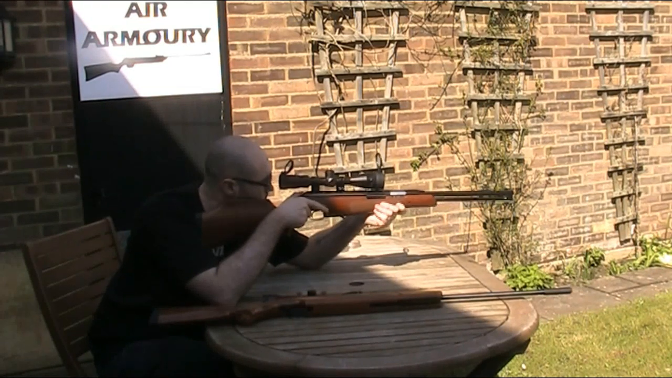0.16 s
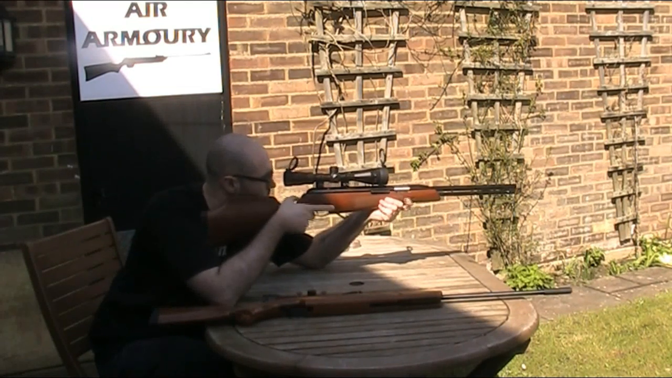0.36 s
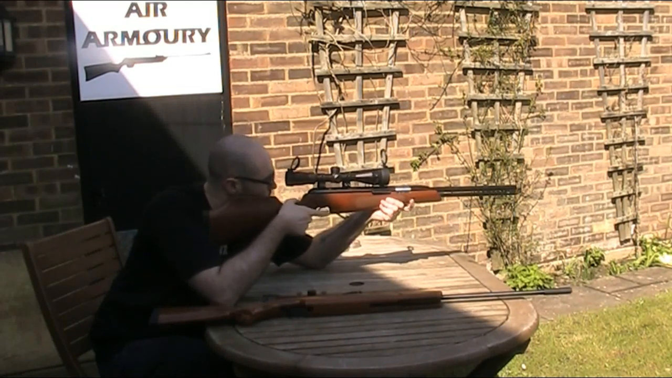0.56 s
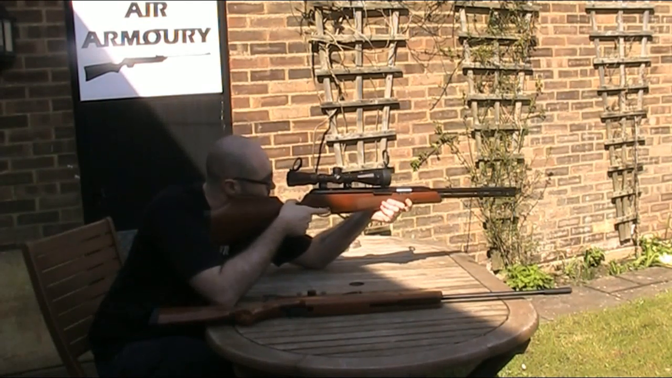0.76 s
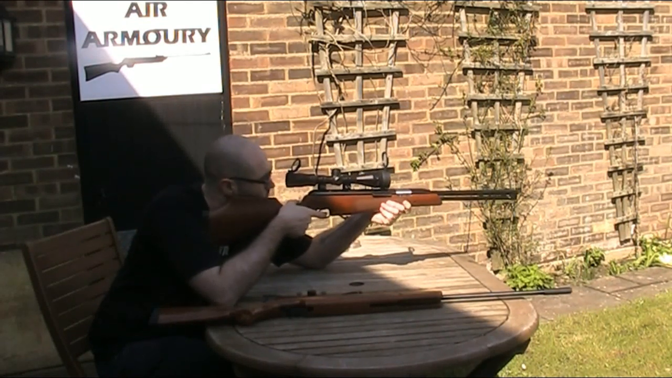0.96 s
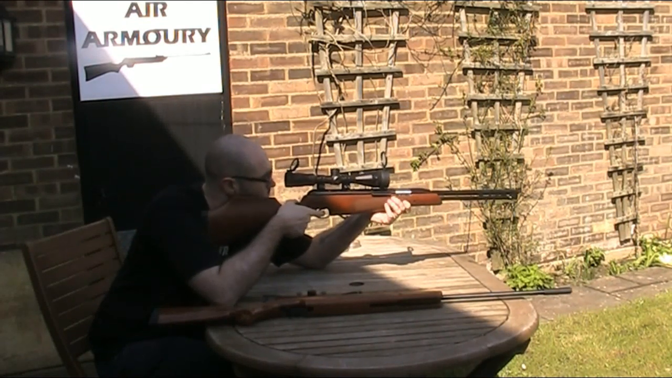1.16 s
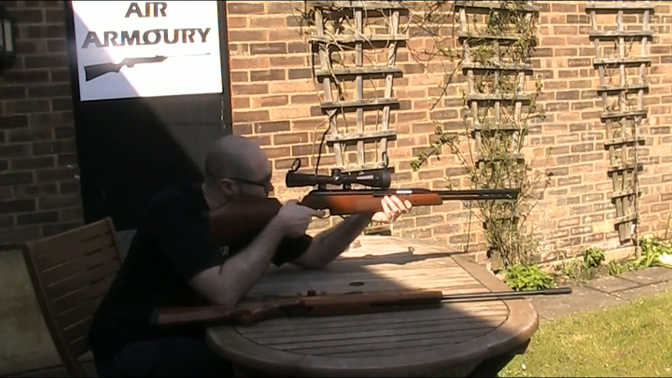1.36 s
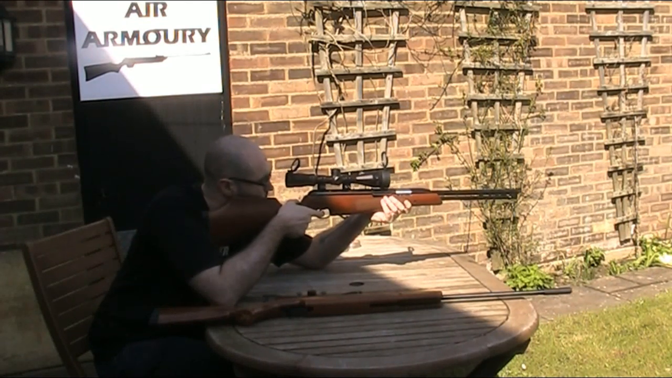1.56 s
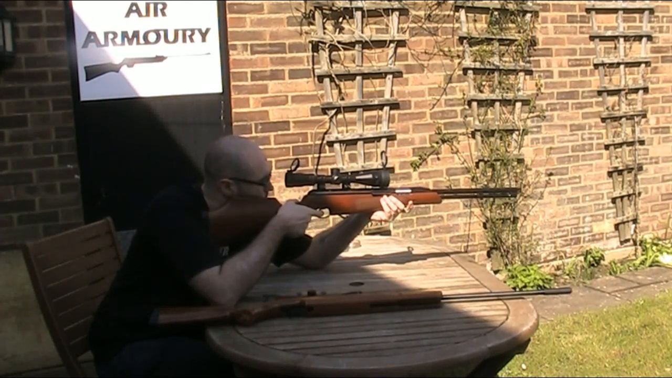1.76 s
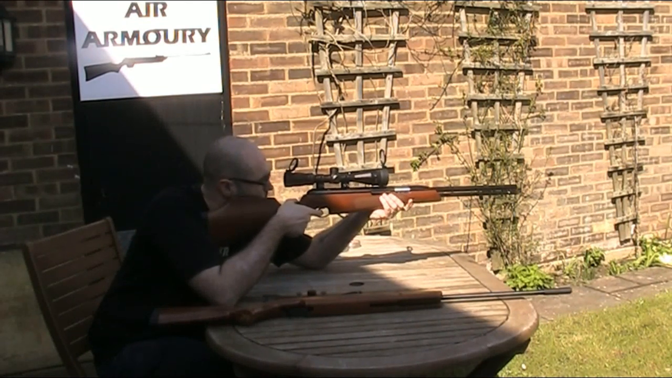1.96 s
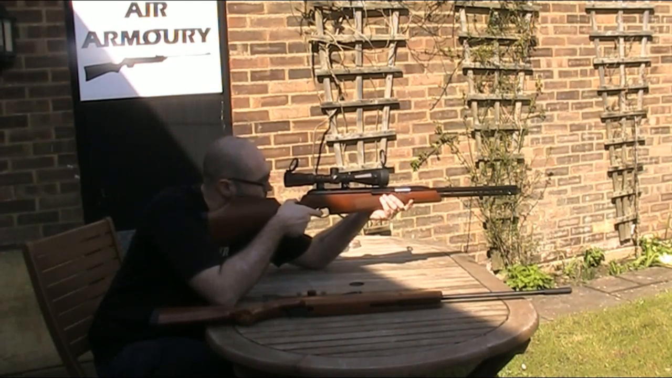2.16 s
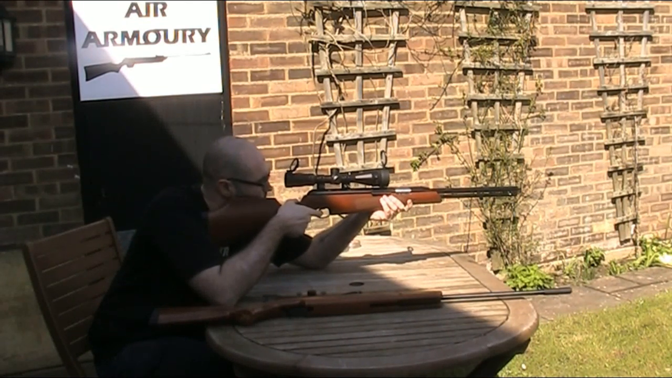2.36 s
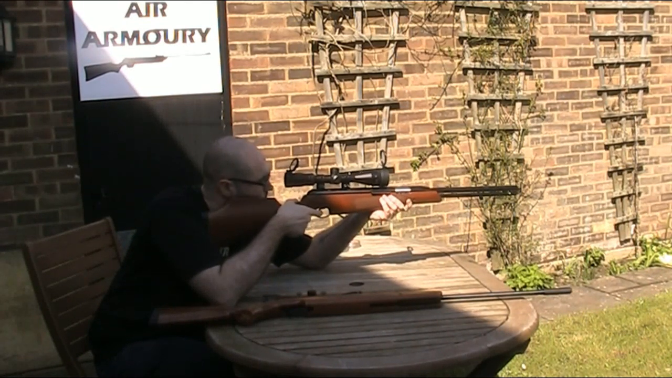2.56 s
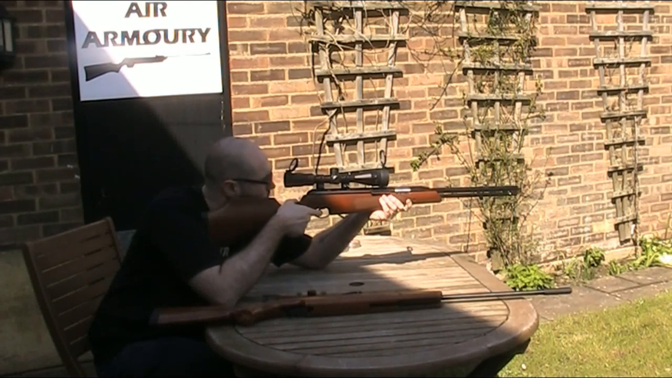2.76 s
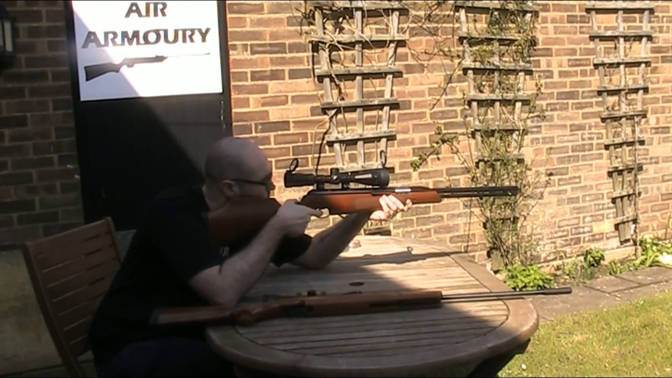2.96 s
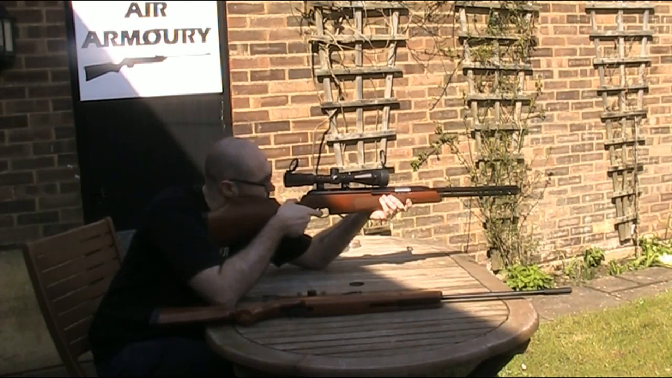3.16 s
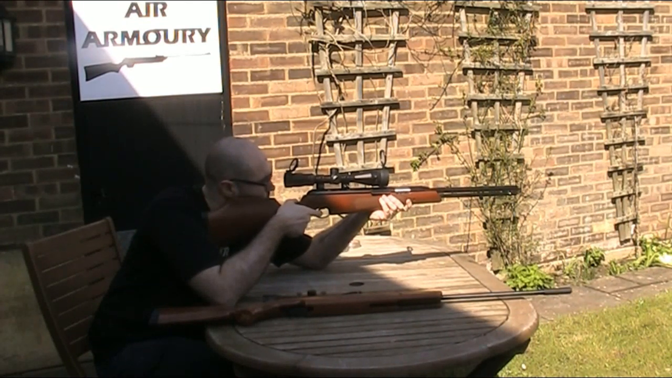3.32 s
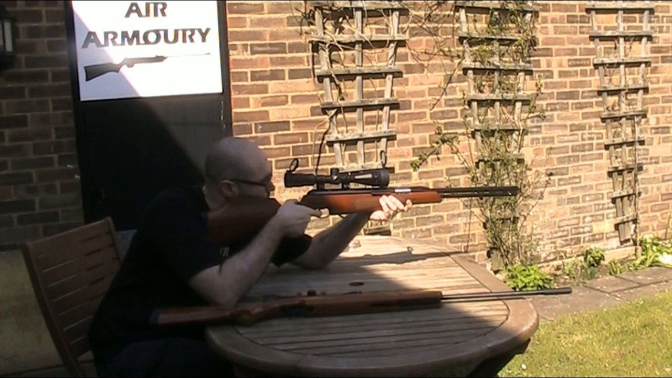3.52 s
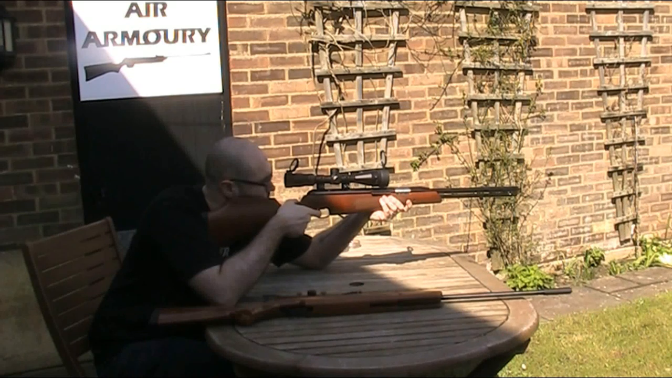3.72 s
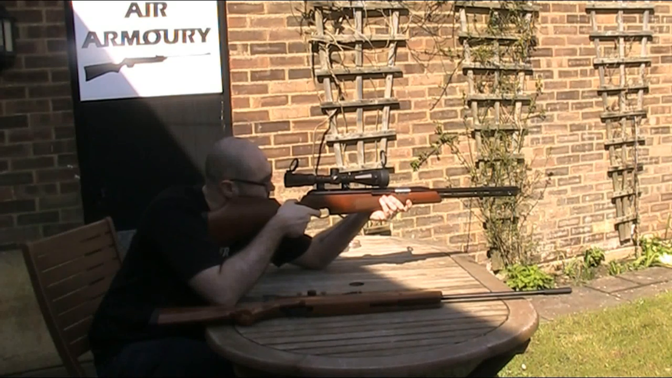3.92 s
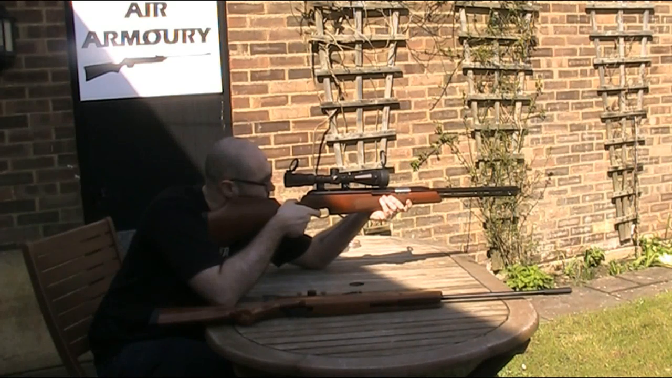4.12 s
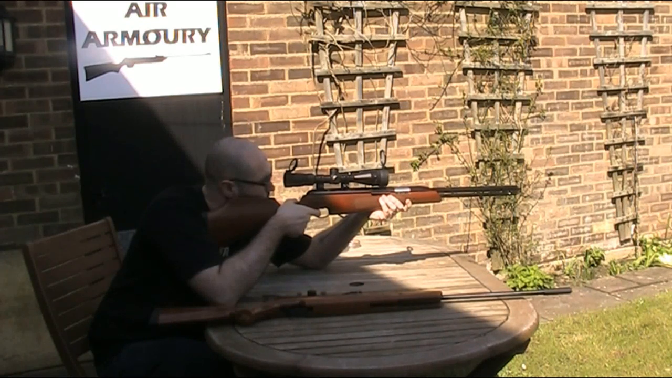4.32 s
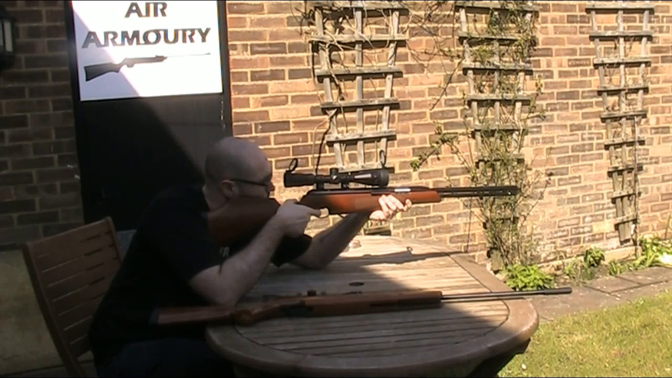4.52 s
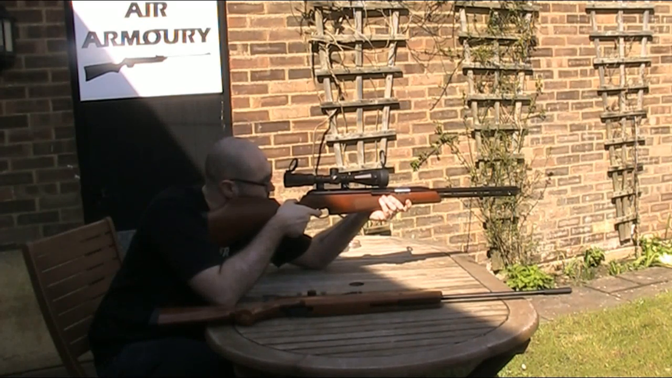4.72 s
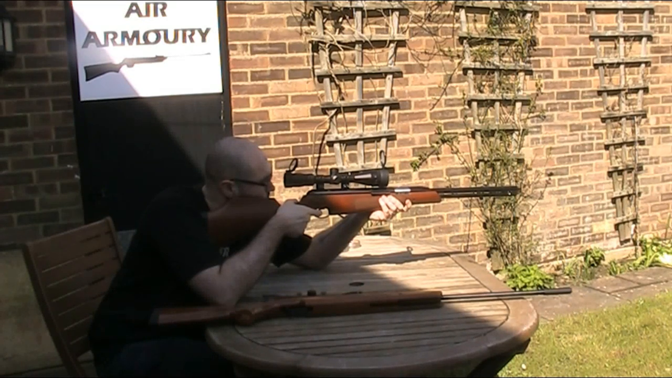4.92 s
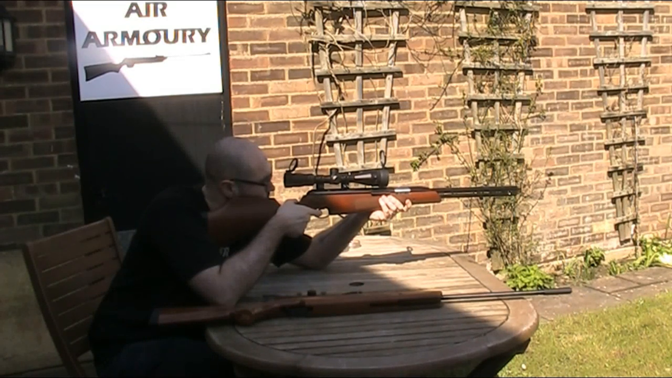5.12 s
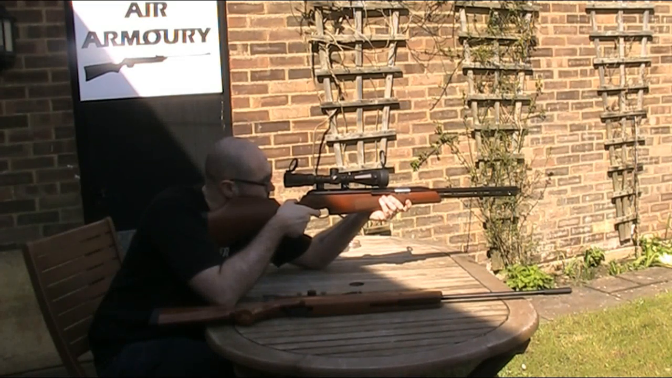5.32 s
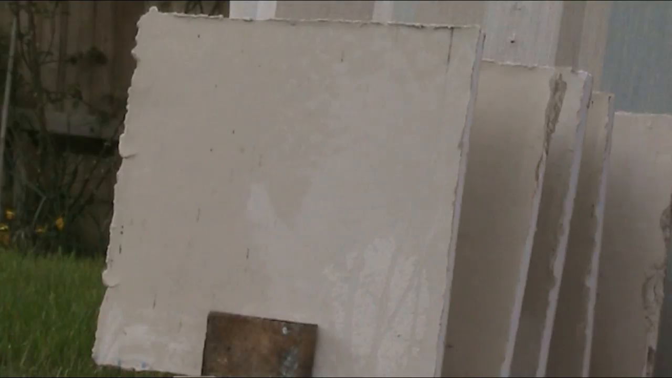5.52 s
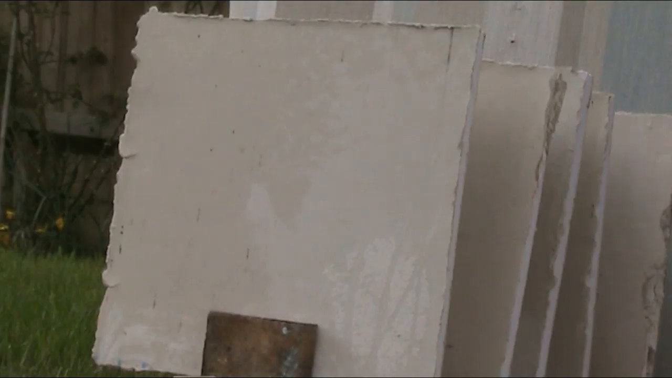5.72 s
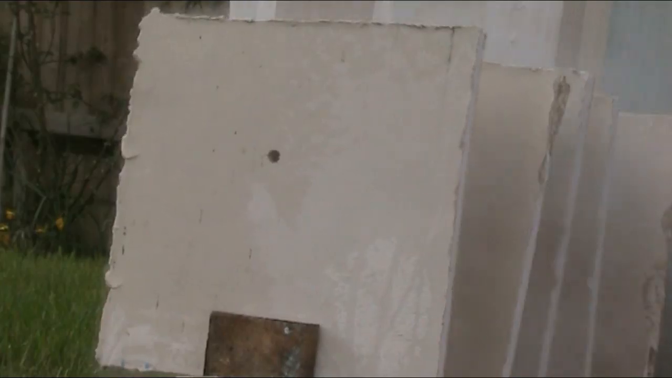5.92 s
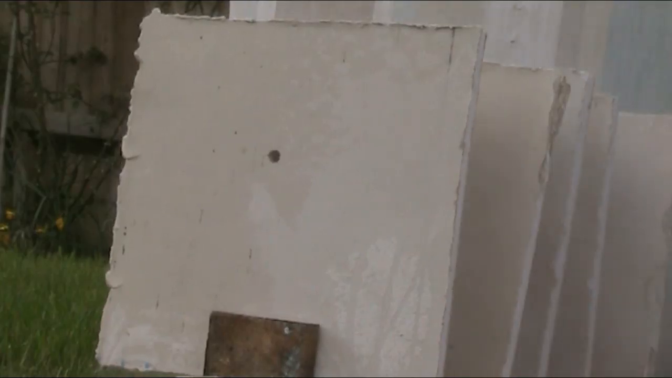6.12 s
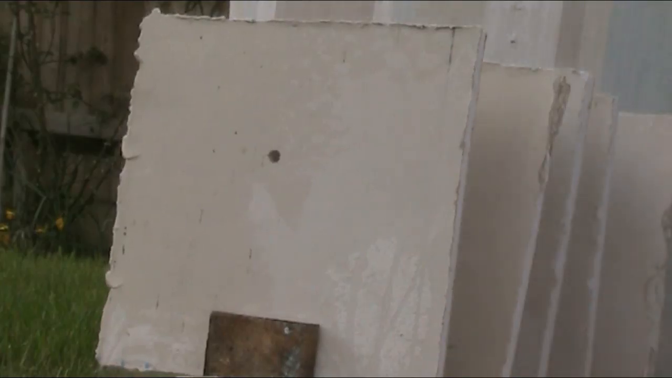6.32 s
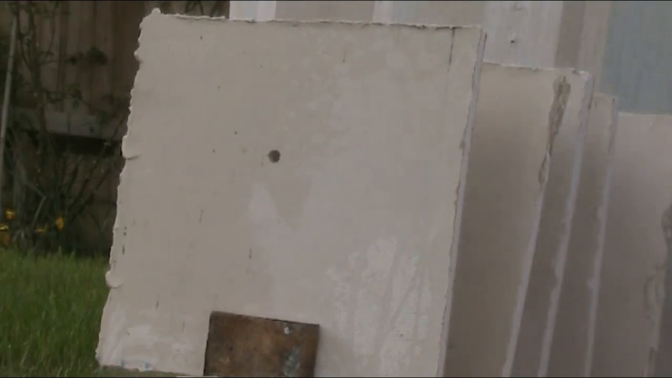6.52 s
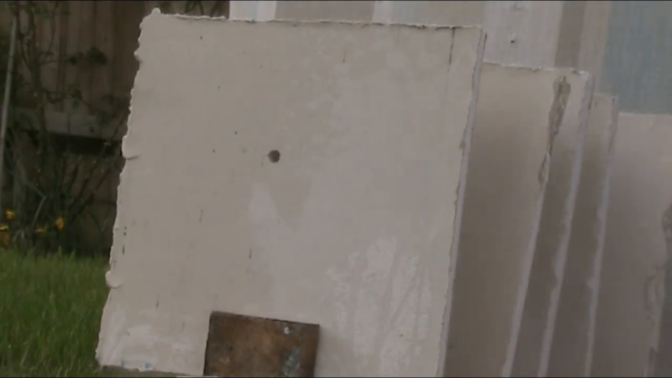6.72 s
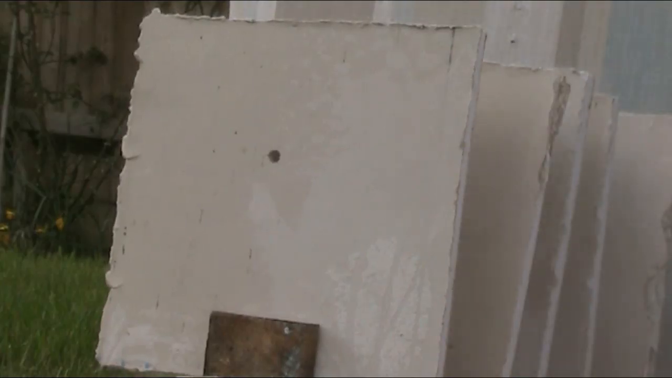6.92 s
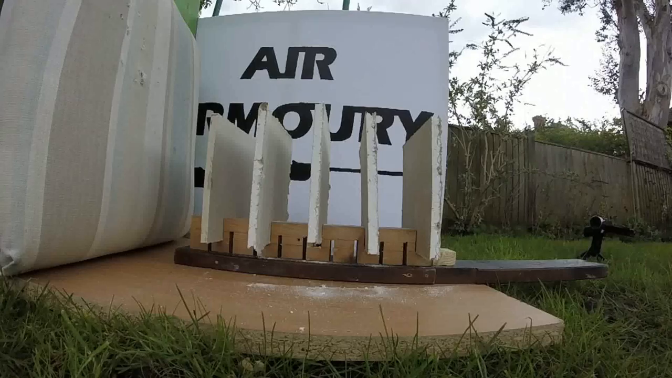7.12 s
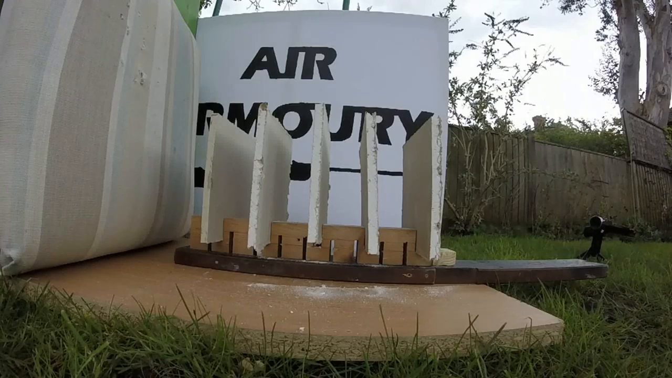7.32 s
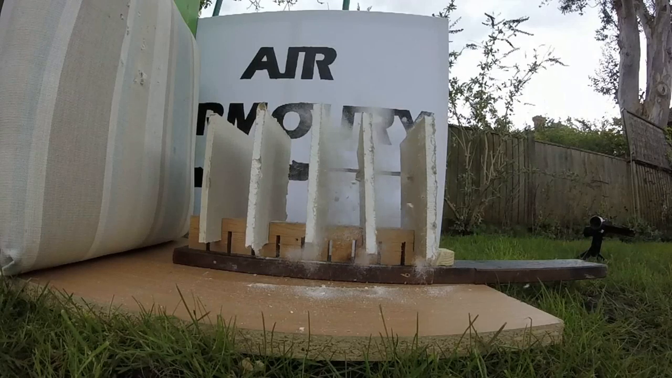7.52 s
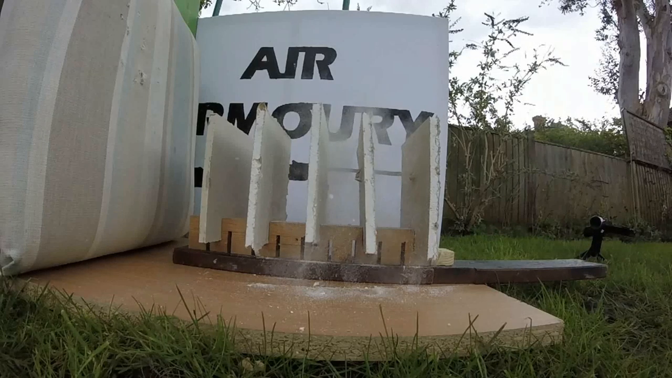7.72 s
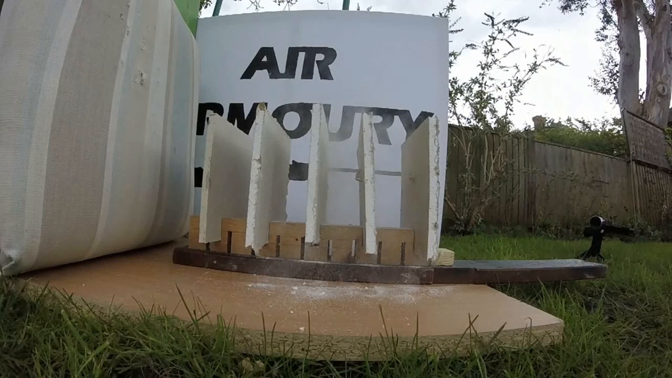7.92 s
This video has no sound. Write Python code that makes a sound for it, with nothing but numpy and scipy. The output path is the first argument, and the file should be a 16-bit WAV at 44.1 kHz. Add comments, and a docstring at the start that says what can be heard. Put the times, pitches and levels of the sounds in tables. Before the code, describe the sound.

Quiet garden with birds and low hum, then a spring air rifle cracks three times, pellets smacking through plaster boards from three different listening spots.

```python
"""Small clicks of a handled air rifle open over town hum, wind, a ticking motor and far birds in a walled garden.
The spring-piston rifle is then fired at plaster boards, heard beside the shooter, in front of the boards
and on the lawn next to them, where one microphone feeds both channels. A dove coos before the second place.
Shots, strikes and chips are shaped noise bursts with short rings and echoes; struck bodies ring as dying sines.
Hum and wind are coloured noise, and the birds are gliding tones."""
import sys
import numpy as np
from scipy import signal
from scipy.fft import rfft, irfft, next_fast_len
from scipy.io import wavfile

SR = 44100
rng = np.random.default_rng(int(sys.argv[2]) if len(sys.argv) > 2 else 0)


def materialize(psi):
    """Save the field psi as 16-bit PCM at rate SR to the path in sys.argv[1].

    A 1-D psi becomes a single channel; in a 2-D psi each row is a channel.
    """
    bounded = np.clip(np.atleast_2d(psi).T, -1, 1)
    quanta = np.round(bounded * 32767).astype(np.int16)
    wavfile.write(sys.argv[1], SR, quanta)


N = 351503   # length in samples

# Times that bound the three listening places: time_s [s]
PLACE_EDGES = [0, 5.4194, 7.017, 8]
# How alike left and right are for near sounds: pitch_hz [Hz], likeness [0 unrelated to 1 same]
NEAR_LIKENESS = [(60, 0.27), (180, 1), (550, 0.44), (1650, 0.85), (4970, 0.18), (15000, 0.57)]


def from_db(db):
    """Turn decibels into a gain."""
    return 10 ** (np.asarray(db) / 20)


def rms_one(x):
    """Scale a signal to an rms (average strength) of 1."""
    return x / np.sqrt(np.mean(x ** 2) + 1e-20)


def at_hz(points, hz):
    """Read a table between its rows, with pitch on a logarithmic axis."""
    table = np.array(points)
    return np.interp(np.log(hz), np.log(table[:, 0]), table[:, 1])


def place_at(s):
    """Number of the listening place at a time: 0, 1 or 2."""
    return np.searchsorted(PLACE_EDGES, s) - 1


def drift(rate, size):
    """Slow random wander of spread 1, made by smoothing noise; a higher rate (Hz) wanders faster."""
    knot_rate = 400   # random points a second
    knots = rng.standard_normal(int(size / SR * knot_rate) + 400)
    r = np.exp(-2 * np.pi * rate / knot_rate)
    smooth = signal.lfilter([1], [1, -2 * r, r * r], knots)
    slow = rms_one(smooth[398:])   # leave out the filter's start
    return np.interp(np.arange(size) / SR * knot_rate, np.arange(len(slow)), slow)


def add(out, s, x):
    """Mix x into out from time s."""
    i = round(s * SR)
    out[..., i:i + x.shape[-1]] += x[..., :N - i]


def noise(size, colour, alike, shape=None):
    """Stereo coloured noise, rms 1 before shape(hz) gives each half-octave band its own gain over time."""
    long = next_fast_len(size)
    hz = np.maximum(np.arange(long // 2 + 1) * SR / long, 1)
    likeness = np.clip(at_hz(alike, hz), -1, 1)
    mid, side = rfft(rng.standard_normal((2, long))) * from_db(at_hz(colour, hz))
    # the shared part goes to both ears, the other part with opposite signs
    pair = np.sqrt(1 + likeness) * mid + np.sqrt(1 - likeness) * side * [[1], [-1]]
    pair = pair / np.sqrt(np.mean(irfft(pair, long) ** 2))
    if shape is None:
        return irfft(pair, long)[:, :size]
    total = np.zeros((2, size))
    for centre_hz in 20 * 2 ** np.arange(0, 10.5, .5):
        octaves_away = abs(np.log2(np.maximum(hz, 20) / centre_hz))
        band = pair * np.clip(1 - 2 * octaves_away, 0, 1)
        total += irfft(band, long)[:, :size] * shape(centre_hz)
    return total


def dying(hz, t60, phase=0):
    """A sine of height 1 that fades by 60 dB in t60 seconds."""
    t = np.arange(int(t60 * SR) + 2) / SR
    return np.sin(2 * np.pi * hz * t + phase) * from_db(-60 * t / t60)


def blows(rows, colours, wall_db=-30, wall_t60=.06):
    """A blow is a burst of noise coloured for its place, plus a short ring and a wall echo."""
    out = np.zeros((2, N))
    t = np.arange(int(.3 * SR)) / SR
    for s, level_db, t60, ring_hz, ring_db, *tilt_db in rows:
        rise = .05 * t60
        shape = np.minimum(t / rise, 1) * from_db(-60 * np.maximum(t - rise, 0) / t60)
        colour = np.array(colours[place_at(s)], float)
        colour[:, 1] += sum(tilt_db) * np.maximum(np.log2(colour[:, 0] / 3300), 0)   # tilt above 3300 Hz
        burst = noise(len(t), colour, NEAR_LIKENESS)
        # a low ring is one clean pressure swing; a high one is a cluster of close modes
        ring_colour = [(.4 * ring_hz, -70), (.75 * ring_hz, -18), (ring_hz, 0),
                       (1.3 * ring_hz, -18), (2.2 * ring_hz, -70)]
        cluster = noise(len(t), ring_colour, NEAR_LIKENESS)
        rough = np.clip(ring_hz / 1400 - .55, 0, .8)
        ring = rough * cluster - (1 - rough) * np.sin(2 * np.pi * ring_hz * t)
        wall = from_db(level_db + wall_db - 60 * t / wall_t60) * np.minimum(t / .0035, 1)
        direct = shape * (from_db(level_db - 2) * burst + from_db(ring_db) * ring)
        # the echo reuses the noise backwards, with left and right swapped
        add(out, s, direct + wall * burst[::-1, ::-1])
    return out


def town_hum():
    """Far traffic and hiss: slightly patchy noise with another colour at each place."""
    # Hum before its patchiness, one entry a place: level_db [dB rms]
    hum_levels = [-52.5, -51.5, -58]
    # Colour of the hum, one list a place: pitch_hz [Hz], level_db [dB per Hz]
    hum_colours = [
        [(18, -35), (30, -5.5), (90, -7), (203, -12.5), (264, -10), (294, -12.5), (424, -9), (565, -9),
         (816, -8.5), (1380, -15), (3450, -27), (6140, -31), (15800, -43.5)],
        [(15, -44.5), (25, -18), (64, -2), (96, -4), (486, -3.5), (1550, -15), (2140, -17), (2590, -21.5),
         (4440, -24), (15800, -41.5)],
        [(18, -30), (30, -1), (232, -9.5), (301, -8.5), (372, -10.5), (1210, -17.5), (1660, -18.5), (3280, -23),
         (8200, -33.5), (14600, -48), (15800, -63)],
    ]
    # Left-right likeness at the first two places: pitch_hz [Hz], likeness [-1 to 1]
    hum_likeness = [
        [(60, -0.022), (380, 0.38), (2380, -0.23), (15000, -0.15)],
        [(60, 0.34), (380, 0.34), (2380, -0.13), (15000, -0.22)],
    ]
    # The hum sinks for a while after the last strike: middle_s [s], depth_db [dB], half_length_s [s]
    hum_dip = (7.66, 4, .2)
    out = np.zeros((2, N))
    likeness = hum_likeness + [[(1, 1)]]   # both channels are the same at the last place
    for start, end, level_db, colour, alike in zip(PLACE_EDGES, PLACE_EDGES[1:], hum_levels, hum_colours, likeness):
        size = round(end * SR) - round(start * SR)
        patchy = noise(size, colour, alike, lambda hz: from_db(1.2 * drift(6.6, size)))
        add(out, start, from_db(level_db) * patchy)
    middle, depth_db, half = hum_dip
    dip = np.exp(-((np.arange(N) / SR - middle) / half) ** 2)
    return out * from_db(-depth_db * dip)


def wind():
    """Wind on the microphone ports: low, lumpy noise, strongest where the housing booms, with gusts."""
    # Gusts that buffet the ports, added to the breeze: peak_s [s], level_db [dB], half_length_s [s]
    gusts = [(.9, -67, .4), (1.728, -55, .04), (2.8, -54, 0.052), (2.942, -50, 0.063), (3.22, -50.5, 0.064),
             (3.4, -54, .1), (3.594, -50, .05), (5.55, -61, 0.11), (6.598, -59, 0.22), (7.349, -57, .15)]
    t = np.arange(N) / SR
    strength = from_db(-69)   # the breeze under the gusts
    for s, level_db, half in gusts:
        strength = strength + from_db(level_db) * np.exp(-((t - s) / half) ** 2)
    colour = [(20, -14), (50, -3.5), (78, -7.0), (97, 2.5), (125, -6.5), (250, -13), (500, -30.5), (2000, -85.5)]
    rumble = noise(N, colour, [(1, .0013)])   # almost unrelated in the two ports
    lumps_db = 2.3 * np.array([drift(11, N), drift(14, N)])
    return rumble * strength * from_db(lumps_db)


def motor():
    """A small motor in the camera ticks in groups of four, each tick ringing the camera housing."""
    # Stretches of ticking: count_start_s [s], heard_from_s [s], heard_until_s [s]
    motor_runs = [(.0395, .07, .63), (6.279, 6.35, 7.01)]
    # A long and a short pause between groups, in turn: pause_s [s]
    group_pauses = (.0633, .0567)
    # Ring of the housing: pitch_hz [Hz], level_db [dB], t60_s [s]
    tick_modes = [(3600, -5, 0.012), (4500, -4, 0.011), (3950, -8, 0.0088), (3150, -10, .014)]
    tick_gap_s, motor_db = .04, -52.5
    out = np.zeros(N)
    gaps = np.concatenate([[tick_gap_s] * 3 + [pause] for pause in group_pauses * 3])
    for start, heard, until in motor_runs:
        times = start + np.cumsum(gaps)
        for s in times[(times > heard) & (times < until)]:
            uneven_db = rng.normal(0, 2.2, len(tick_modes))   # no two ticks ring quite alike
            for (hz, level_db, t60), own_db in zip(tick_modes, uneven_db):
                add(out, s, from_db(motor_db + level_db + own_db) * dying(hz, t60))
    return out


def birds():
    """Gliding whistles; fast trills and distance blur each into a band, different in each ear."""
    # Each call: start_s [s], song [name], length_s [s], level_db [dB rms over half a second]
    bird_calls = [(.08, "level", 0.12, -69), (0.6, "trill", .2, -58.5), (1.24, "whistle", 0.13, -66.5),
                  (1.323, "fall", .12, -69), (1.81, "whistle", 0.088, -72), (2.038, "trill", .13, -58.5),
                  (2.175, "low trill", .15, -63), (2.738, "rise", .13, -67), (2.835, "fall", 0.17, -70),
                  (3.132, "whistle", 0.15, -66.5), (3.22, "fall", .11, -71), (3.706, "trill", .19, -63),
                  (4.109, "droop", .17, -67), (5.045, "trill", .32, -59), (5.417, "high rise", .075, -59.5),
                  (6.36, "pipe", 0.15, -67), (6.575, "pipe", .12, -64), (6.645, "long pipe", .165, -57)]
    # By song name: first_hz [Hz], last_hz [Hz], blur_hz [Hz], lateness of the swell [power, 1 if absent]
    songs = {"trill": (3950, 3450, 520), "low trill": (4100, 3100, 850), "whistle": (5620, 5420, 120),
             "fall": (5300, 4300, 300), "level": (5360, 5150, 150), "rise": (3500, 3900, 400),
             "high rise": (4300, 4700, 450), "pipe": (2185, 2160, 8), "long pipe": (2165, 2115, 8, 1.5),
             "droop": (2220, 2100, 42)}
    out, size = np.zeros((2, N)), int(.5 * SR)
    for s, song, length, level_db in bird_calls:
        first_hz, last_hz, blur_hz, *late = songs[song]
        progress = np.arange(size) / SR / length
        along = np.minimum(progress, 1)
        swell = np.sin(np.pi * along ** np.prod(late)) ** .51
        tail = signal.lfilter([8e-4], [1, 9e-4 - 1], swell) * .7   # a soft tail
        shape = np.maximum(swell, tail)
        glide_hz = first_hz + (last_hz - first_hz) * along
        turn = np.exp(2j * np.pi * np.cumsum(glide_hz) / SR)
        r = np.exp(-2 * np.pi * blur_hz / SR)
        white = rng.standard_normal((2, 2 * size)) + 1j * rng.standard_normal((2, 2 * size))
        blur = signal.lfilter([1], [1, -2 * r, r * r], white)[:, size:]
        blur = blur / np.sqrt(np.mean(abs(blur) ** 2))
        blur = blur + 6 / blur_hz   # a slow whistle keeps a steady core
        add(out, s, from_db(level_db) * shape * rms_one((blur * turn).real))
    return out


def dove():
    """A near-pure, slightly unsteady coo: pitch and level follow effort, throbbing as the throat catches."""
    # Coos, with levels before effort and throb: start_s [s], swell_s [s], hold_s [s], level_db [dB rms],
    # pitch lost at no effort sag_hz [Hz]
    coos = [(5.051, .09, .232, -37, 150), (5.4, .018, .1, -33, 20)]
    coo_hz, faint_db, release_s, grows_db_per_s = 502, 28, .035, 8
    # the throat closes briefly and regularly, less and less deeply
    catch_first_s, catch_gap_s, catch_half_s = 5.102, .0327, .008
    catch_db, catch_fade_s = 13, .22
    t, out = np.arange(N) / SR, 0
    since = t - catch_first_s + catch_gap_s / 2
    off = since % catch_gap_s - catch_gap_s / 2   # time from the nearest catch
    easing = np.maximum(since, 0) / catch_fade_s
    dips_db = catch_db * np.exp(-easing - (off / catch_half_s) ** 2) * (since > 0)
    for s, swell, hold, level_db, sag_hz in coos:
        end = s + swell + hold + release_s
        effort = np.clip(np.minimum((t - s) / swell, (end - t) / release_s), 0, 1)
        slack = 1 - effort
        hz = coo_hz - sag_hz * slack ** 1.31 + 5 * drift(15, N)
        effort_db = grows_db_per_s * np.clip(t - s, 0, 1) - faint_db * slack ** 1.4
        gain = from_db(level_db + effort_db - dips_db + 1.5 * drift(25, N))
        gain = gain * np.minimum(8 * effort, 1)   # silent outside the coo
        out = out + np.sqrt(2) * gain * np.sin(2 * np.pi * np.cumsum(hz) / SR)
    out = out * (t < PLACE_EDGES[1])   # ends with the change of place
    return out * from_db([[.5], [-.5]])   # slightly to the left


def rustle():
    """A sleeve brushes past: a soft swell of bright noise."""
    # The brush: start_s [s], length_s [s], level_db before the swell [dB rms]
    brush = (.265, .11, -65)
    # Its colour: pitch_hz [Hz], level_db [dB per Hz]
    brush_colour = [(4500, -25), (6800, 0), (10000, -4), (15000, -15)]
    out = np.zeros((2, N))
    s, length, level_db = brush
    size = int(length * SR)
    swell = np.sin(np.pi * np.arange(size) / size)
    add(out, s, from_db(level_db) * swell * noise(size, brush_colour, NEAR_LIKENESS))
    return out


def handling():
    """Small metal clicks as the rifle is handled, each a tiny blow."""
    # Clicks: start_s [s], level_db [dB], t60_s [s], ring_hz [Hz], ring_db [dB], treble tilt_db [dB per octave]
    clicks = [(.0270, -29, .013, 4270, -35.5, 2), (.0382, -41, .015, 6300, -46, 2),
              (.042, -51, .17, 9000, -62, -1), (.863, -52, .014, 4680, -38, -6),
              (.8635, -58, 0.021, 3400, -43, -10), (2.964, -57, .05, 1800, -51, -14),
              (2.972, -56, .04, 2900, -58, -10)]
    # Colour at the first place: pitch_hz [Hz], level_db [dB per Hz]
    click_colours = [
        [(1500, -13), (3000, -2.5), (7000, 0.5), (11000, -2), (15900, -29)],
    ]
    return blows(clicks, click_colours)


def chips():
    """Plaster chips land as light dry ticks; big pieces land dull."""
    # Landings: start_s [s], level_db [dB], ring_hz [Hz], ring level against level_db [dB],
    # treble tilt_db [dB per octave]
    landings = [(5.9639, -26, 934, -6, 8), (5.9958, -23, 1140, -3, 1), (6.0715, -30, 1800, -2, 2.5),
                (6.1482, -26, 2500, -3, -0.5), (6.1907, -29, 2600, 0, -1), (6.237, -33, 1500, -8, -2),
                (6.2415, -42, 680, 9, -8), (6.2561, -35, 690, 2.5, -7), (6.258, -42, 1600, 5, -8),
                (6.2801, -31, 1540, -6, -6), (6.3025, -24.5, 1520, -6, 0), (6.324, -38, 692, -1, -8),
                (6.325, -44, 1550, 6, -8), (7.512, -36, 2750, 3, 11), (7.555, -50, 4900, 0, 4),
                (7.6091, -42, 6400, -5, 5), (7.642, -39, 1420, -6, 0), (7.709, -48, 2600, -4, 14),
                (7.7178, -46, 2690, -3, 1), (7.794, -44, 2610, 3, -1), (7.837, -45, 2720, 8, -6),
                (7.884, -50.5, 1463, -3.5, -4), (7.9015, -61, 6200, 2, 3), (7.9265, -59, 6300, 2, -3),
                (7.9482, -47, 1380, -5, 2)]
    # Colour, one list a place (no chips at the first): pitch_hz [Hz], level_db [dB per Hz]
    chip_colours = [None, [(180, -34), (300, -7.5), (545, -1.5), (2680, -3), (5200, -12.5), (7120, -12),
                    (10100, -23.5), (15800, -52)], [(530, -45), (900, -15), (1320, -13.5), (3930, -5.5),
                    (5240, -21), (7420, -10.5), (15800, -76)]]
    # Wall echo against the chip, one entry a place: level_db [dB]
    chip_echo_levels = [None, -16.5, -25]
    out = np.zeros((2, N))
    for s, level_db, ring_hz, under_db, tilt_db in landings:
        row = (s, level_db, .022, ring_hz, level_db + under_db, tilt_db)   # every chip has a t60 of 22 ms
        out += blows([row], chip_colours, chip_echo_levels[place_at(s)], wall_t60=.17)
    return out


def echoes():
    """Walls and fences send back dense noise, each pitch range fading at its own rate."""
    # Garden echoes: (start_s [s], level_db before fading [dB rms]),
    # colour (pitch_hz [Hz], level_db [dB per Hz]), decay (pitch_hz [Hz], t60_s [s])
    echo_rows = [((4.335, -15.5), [(35, -44), (60, -7.5), (152, -18), (270, -13), (416, -2), (694, -5.5),
                 (897, -9.5), (1130, -5), (2180, -11), (4380, -10.5), (8810, -14.5), (15800, -27.5)],
                 [(200, 0.22), (450, .22), (2000, 0.4), (12000, 0.22)]), ((4.398, -36), [(1200, -30),
                 (3000, 0), (7000, -3), (15800, -14)], [(3000, .3), (12000, .16)]), ((4.440, -19),
                 [(59, -52.5), (100, -27.5), (265, -16), (405, -7), (605, -27.5), (748, -10), (1070, -16),
                 (1240, -13.5), (1570, -16.5), (2160, -11.5), (4340, -18.5), (4930, -29.5), (6910, -22.5),
                 (14200, -51.5), (15800, -85)], [(100, .5), (400, 0.46), (1000, 0.45), (2200, 0.45),
                 (4500, 0.41), (12000, .2)]), ((4.428, -27.5), [(1400, -45), (2050, 3), (2400, 0),
                 (3500, -45)], [(2000, 0.63), (2500, 0.6)]), ((4.445, -45), [(500, -30), (1500, -3),
                 (4500, -6), (9000, -25)], [(1500, 1.3), (6000, .9)]), ((4.612, -41.5), [(420, -50),
                 (750, 2), (950, 4), (1700, -52)], [(700, 0.33), (1000, 0.2)]), ((5.790, -20), [(35, -33.5),
                 (60, -10), (603, -0.5), (2180, -23), (2680, -16), (3020, -13.5), (5530, -13.5),
                 (11900, -22.5), (15800, -35)], [(200, 0.16), (700, .2), (2000, 0.49), (12000, .2)]),
                 ((5.830, -24.5), [(59, -58.5), (100, -24.5), (295, -15.5), (490, -26), (605, -14.5),
                 (797, -24), (905, -4), (1190, -12.5), (1570, -22.5), (1940, -20.5), (4720, -13),
                 (8360, -22.5), (15800, -47)], [(200, 0.46), (1000, 1), (4000, 0.54), (12000, 0.47)]),
                 ((7.470, -36.5), [(240, -62), (400, -34), (675, -24), (1830, -8.5), (2140, -16),
                 (2780, -10), (3900, -3), (4080, -2), (5220, -15.5), (9080, -16), (15800, -50)],
                 [(500, 0.27), (3000, 0.35), (12000, 0.23)])]
    out, t = np.zeros((2, N)), np.arange(SR) / SR
    for (s, level_db), colour, decay in echo_rows:
        # the echo crackles: its level wanders quickly at random, in all bands together
        crackle_db = 1.5 * drift(120, SR)

        def fade(hz):
            uneven_db = 2.5 * drift(35, SR)   # each band also wanders on its own
            fall_db = -60 * t / at_hz(decay, hz)
            return np.minimum(t / .0026, 1) * from_db(crackle_db + uneven_db + fall_db)

        add(out, s, from_db(level_db) * noise(SR, colour, NEAR_LIKENESS, fade))
    return out


def ringing():
    """Struck bodies ring on in their modes, with a level that flutters at random."""
    # Each time a body is struck, struck again lightly, or has its ring returned by a far wall:
    # start_s [s], body [name], struck_db [dB]
    knocks = [(4.39, "table", -36.5), (4.429, "rack", -26), (5.8205, "punched board", 17.5),
              (5.8197, "board", -19.5), (5.889, "board", -36), (5.916, "board", -34), (6.085, "board", -40),
              (7.4658, "steel", -39)]
    # Modes by body name: pitch_hz [Hz], level_db added to struck_db [dB], t60_s [s]
    bodies = {"table": [(94, -1.5, 0.47)], "rack": [(411, 3, .2), (386, 0, .3), (336, 1, .5)],
              "punched board": [(912, 0, .022), (1226, -7, .035)], "board": [(925, 6, .16), (1232, 5, .11),
              (890, -16, .8), (1135, -12.5, .4), (988, -7, 0.36)], "steel": [(4192, -7, .6),
              (4215, -1, 0.56)]}
    out = np.zeros(N)
    for s, body, struck_db in knocks:
        for hz, level_db, t60 in bodies[body]:
            ring = dying(hz, t60)
            t = np.arange(len(ring)) / SR
            ring = ring * np.minimum(t / (.02 * t60), 1)
            flutter_db = 4.5 * np.minimum(t / .07, 1) * drift(30, len(ring))   # grows over 70 ms
            add(out, s, -from_db(struck_db + level_db + flutter_db) * ring)
    return out


def strikes():
    """The pellet goes through the boards, with slaps off the walls, all as blows."""
    # Strikes: start_s [s], level_db [dB], t60_s [s], ring_hz [Hz], ring_db [dB],
    # treble tilt_db if any [dB per octave]
    strike_rows = [(4.4275, -5.5, 0.02, 1960, -14), (4.4345, -7.5, 0.021, 1890, -9.5, 4),
                   (4.4410, -13, 0.03, 794, -21, 2), (4.4862, -24, .015, 800, -26),
                   (4.502, -29, .015, 2100, -30), (5.8178, -9.5, 0.011, 10990, -16),
                   (5.8195, 10, 0.014, 400.4, -1), (5.8233, 10, .011, 7175, 1.5),
                   (7.4650, 1, .014, 3520, -6.5), (7.4652, -18, .012, 9130, -9),
                   (7.4700, -17, 0.014, 1560, -20)]
    # Colour, one list a place: pitch_hz [Hz], level_db [dB per Hz]
    strike_colours = [
        [(59, -45), (100, -13), (631, -14), (831, 0), (1600, -6), (2020, -7), (8020, -16.5), (15800, -42)],
        [(35, -44.5), (60, -12), (446, -11), (1060, 0), (1640, -12), (2250, -6), (7150, -12), (15800, -28.5)],
        [(180, -66), (300, -29), (1250, -21), (1550, -13), (2510, -7), (3490, 3), (5200, -9.5), (6240, -8),
         (9440, -18.5), (15800, -60)],
    ]
    return blows(strike_rows, strike_colours)


def rifle():
    """Piston run, slam and muzzle puff with their wall echoes, all as blows."""
    # Parts of the shots: start_s [s], level_db [dB], t60_s [s], ring_hz [Hz], ring_db [dB]
    rifle_rows = [(4.3125, -15, .05, 1170, -15.5), (4.3195, -6.5, 0.01, 940, -14),
                  (4.3253, -6.5, .0071, 515, -4.5), (4.3268, 0, .02, 7940, -11),
                  (4.3392, -13, .03, 2450, -16.5), (5.7740, -42, .04, 505, -30),
                  (5.7795, -45, .045, 150, -14), (5.7809, -22, 0.024, 518, -6.5),
                  (5.7828, 3, 0.0047, 4000, -1), (5.7866, -8.5, 0.007, 726, -1.5),
                  (5.7888, -13.5, .025, 5735, -9.5), (5.7935, -14, 0.026, 500, -15.5),
                  (5.8085, -11, .062, 596, -17.5), (5.8120, -15, .048, 5565, -23),
                  (7.4315, -26, 0.02, 6170, -33.5), (7.4358, -35, .03, 6100, -30),
                  (7.4410, -39.5, 0.048, 3470, -50), (7.4525, -36.5, .053, 3300, -39)]
    # Colour, one list a place: pitch_hz [Hz], level_db [dB per Hz]
    rifle_colours = [
        [(35, -38.5), (60, -12), (260, -11), (694, -0.5), (856, -9), (3810, -10), (5400, -16), (10100, -10.5),
         (15800, -28)],
        [(35, -40), (60, -11), (836, -4), (1940, -17.5), (2230, -29), (2680, -13), (5660, -11.5),
         (15800, -31.5)],
        [(180, -48), (300, -4.5), (1740, -10), (2160, -16), (3380, -3.5), (5200, -15), (6140, -5),
         (15800, -42.5)],
    ]
    return blows(rifle_rows, rifle_colours)


def scene():
    """Mix all sources; at the last place one microphone feeds both channels."""
    background = wind() + motor() + birds() + dove()
    shots = rifle() + strikes() + ringing() + echoes() + chips()
    pair = background + rustle() + handling() + shots
    single = np.arange(N) / SR >= PLACE_EDGES[2]
    return np.where(single, pair.mean(axis=0), pair) + town_hum()


def record(dry):
    """Loud peaks overload the input with a fairly hard edge; the deepest bass and the top are cut."""
    overload, cutoff_hz = .92, 15900
    clipped = dry / (1 + abs(dry / overload) ** 6) ** (1 / 6)
    bass_cut = signal.butter(1, 45, "high", fs=SR, output="sos")
    top_cut = signal.ellip(10, .3, 70, cutoff_hz, fs=SR, output="sos")
    return signal.sosfilt(top_cut, signal.sosfilt(bass_cut, clipped))


dry = scene()
out = record(dry)
materialize(out)
```